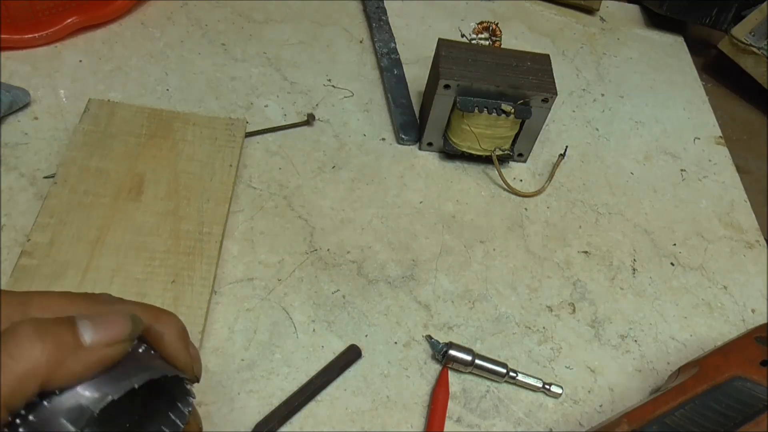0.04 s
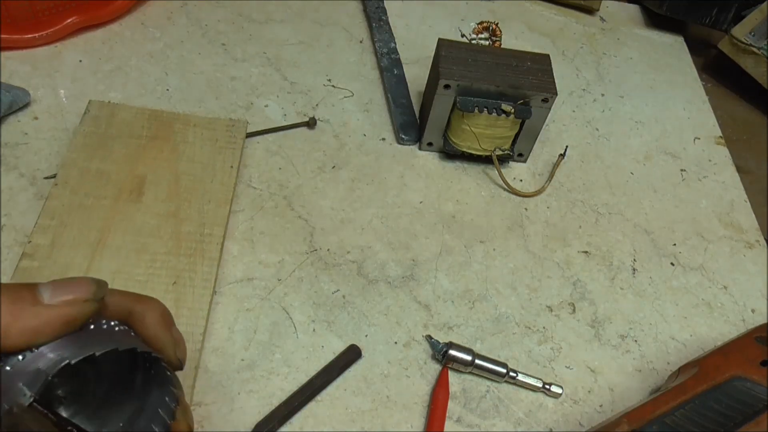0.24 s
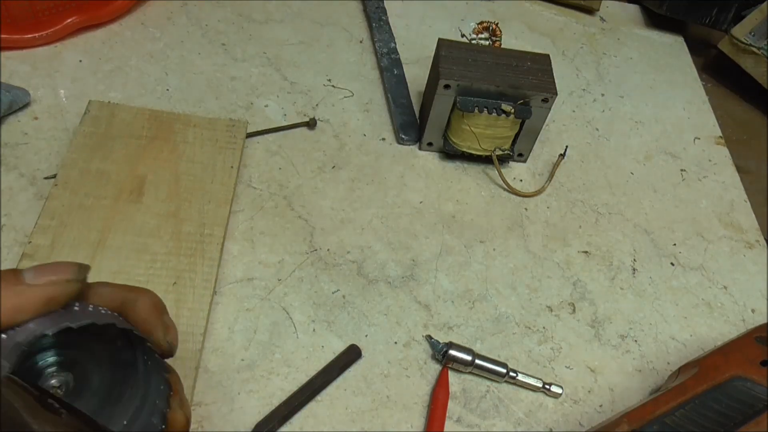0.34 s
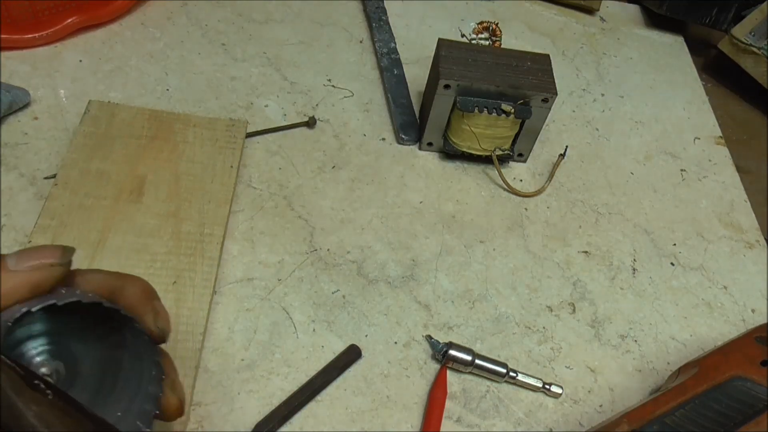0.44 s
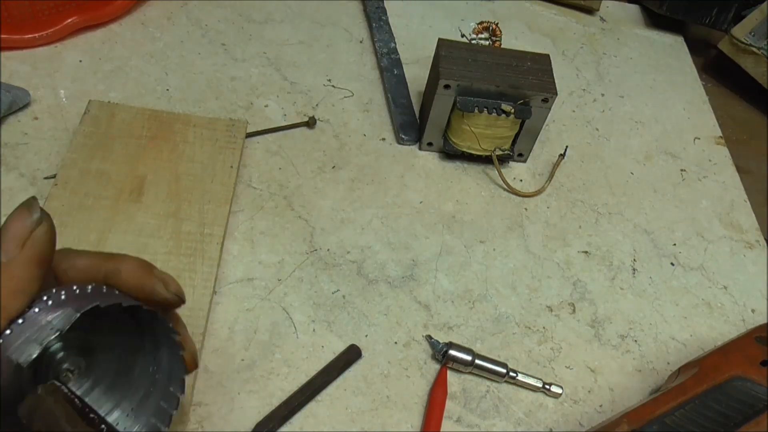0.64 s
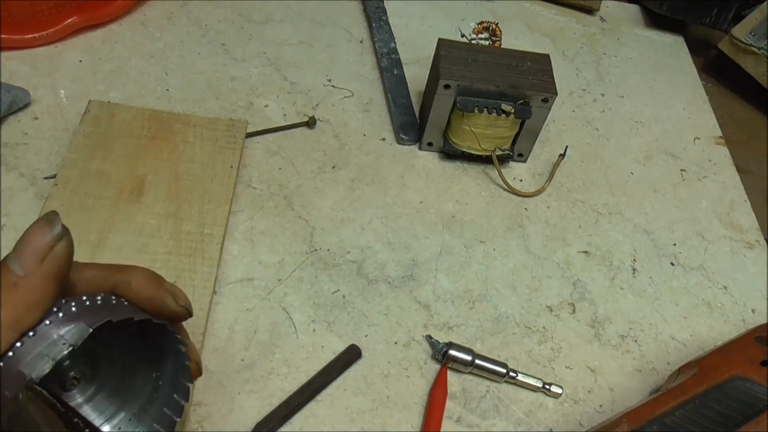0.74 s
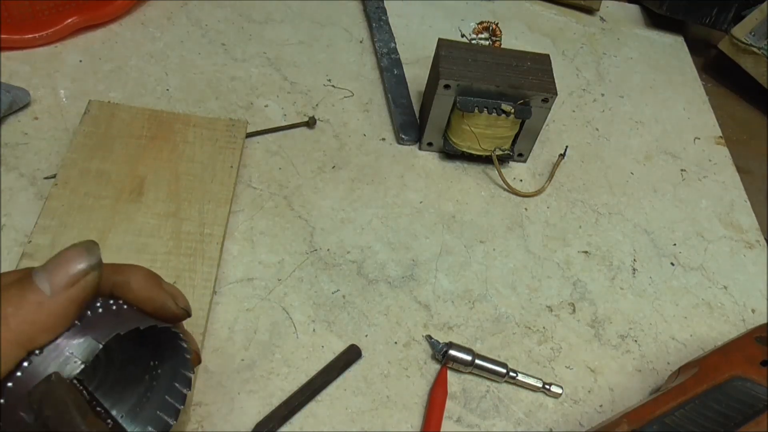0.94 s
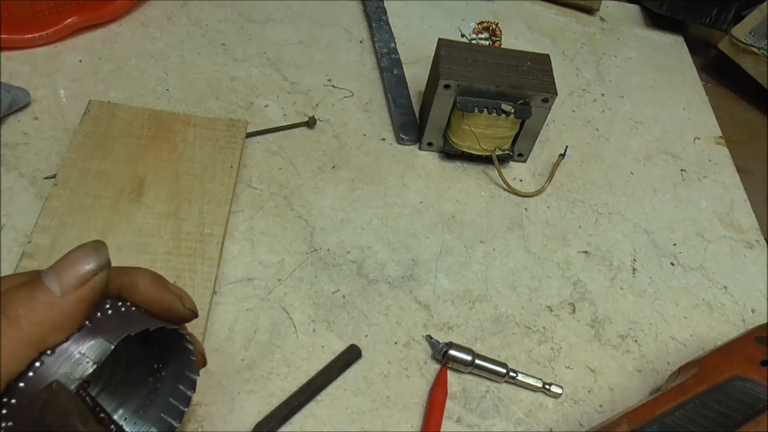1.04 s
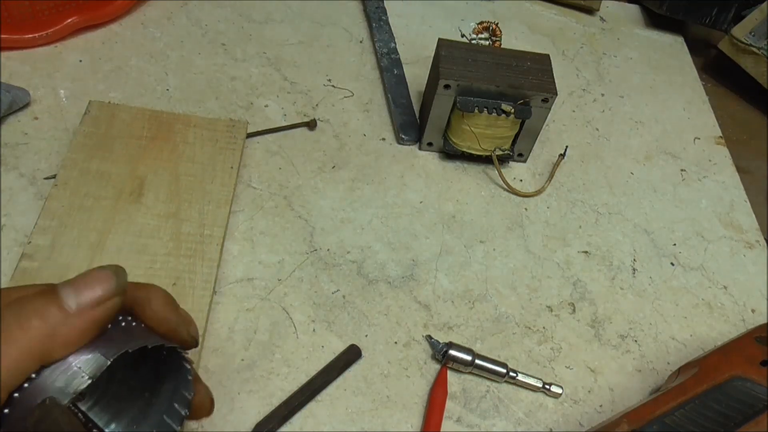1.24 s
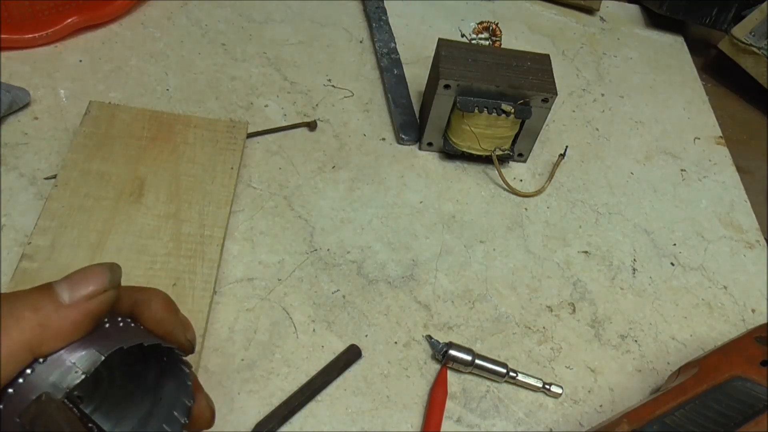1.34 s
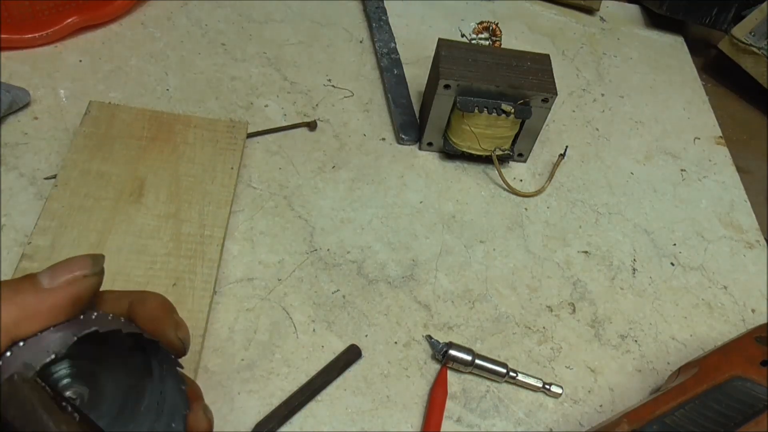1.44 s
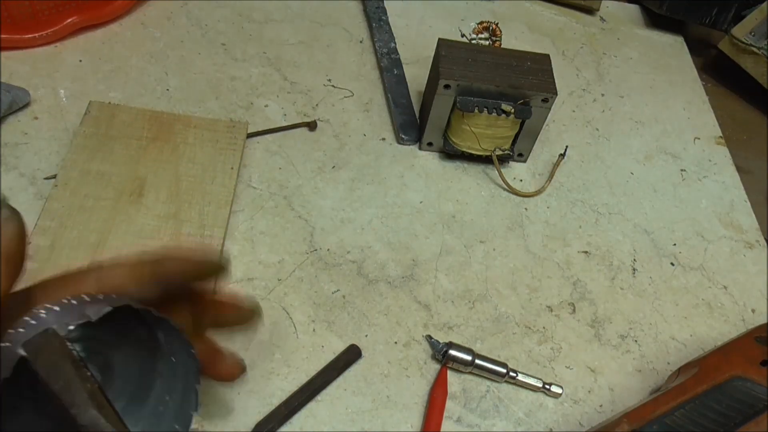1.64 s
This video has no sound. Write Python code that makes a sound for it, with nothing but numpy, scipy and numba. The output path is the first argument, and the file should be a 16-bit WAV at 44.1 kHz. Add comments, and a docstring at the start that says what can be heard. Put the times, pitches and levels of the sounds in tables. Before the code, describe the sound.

Close stereo pickup of thin sheet metal flexed in the hand, one bright hard snap followed by smaller ticks and brief scratches, with a short room tail and a constant airy fan hum slightly right.

```python
"""A fan's rush and hum fill a workshop, slightly right, from shaped noise and steady tones.
A thin treble hiss throbs over it: noise moved to a drifting pitch and pulsed.
Close to a stereo camera, a little left, a thin perforated metal dish is turned and bent by hand:
small ticks, short scrapes and one loud snap ring the modes of the sheet, with a few dull bumps
and a short room tail. The camera's limiter ducks after the snap."""
import sys
import numpy as np
from scipy import signal
from scipy.fft import rfft, irfft
from scipy.io import wavfile
from scipy.ndimage import uniform_filter1d
from numba import njit

SR = 44100
rng = np.random.default_rng(int(sys.argv[2]) if len(sys.argv) > 2 else 0)


def to_wav(sig):
    """Store sig (one row per channel, or 1-D mono) as 16-bit WAV at the path in sys.argv[1].

    Samples outside -1..1 are clipped; the rate is SR.
    """
    pcm = np.clip(np.atleast_2d(sig), -1, 1) * 32767
    pcm = np.round(pcm).astype(np.int16)
    wavfile.write(sys.argv[1], SR, pcm.T)  # frames by channels


def invert_db(level):
    """Linear amplitude ratio for a level in decibels (20 dB per decade), elementwise."""
    return 10 ** (np.asarray(level, dtype=float) / 20)


N = 74970
T = np.arange(N) / SR
LEFT_RIGHT = np.array([[1], [-1]])


def unit(x):
    """Scale to rms 1."""
    return x / np.sqrt(np.mean(x ** 2))


def coloured(db_of_hz):
    """Noise whose spectrum follows a curve of level over frequency."""
    hz = np.arange(N // 2 + 1) * SR / N + 1
    return irfft(rfft(rng.standard_normal(N)) * invert_db(db_of_hz(hz)), N)


def read(table, hz):
    """Read a spectrum table on a log-frequency axis."""
    table_hz, db = np.array(table).T
    return np.interp(np.log(hz), np.log(table_hz), db)


# rush of air, shape only: (frequency [Hz], relative level per Hz [dB])
AIR_SPECTRUM = [(25, -43), (130, -20), (310, -14), (550, -10.5), (770, -7.5), (1090, -11), (1400, -8.5),
                (1830, -10), (2000, -17.5), (2900, -25.5), (3600, -34.5), (4500, -27), (5300, -35.5),
                (6300, -33.5), (7400, -27), (8200, -38), (9000, -26.5), (10200, -39), (13000, -39.5),
                (15700, -36), (16500, -74)]
# stereo spread of the rush: (frequency [Hz], side minus mid [dB])
AIR_SPREAD = [(60, 3), (110, -7.5), (200, -1), (380, -6.5), (700, -5.5), (1290, -12), (2380, 1),
              (4400, -4.5), (15000, -3)]
# fan tones: (frequency [Hz], level before panning [dB], skirt width [Hz], side against tone level [dB])
FAN_TONES = [(401.3, -66.5, 15, -6), (802.6, -69, 15, -8), (1203.9, -59, 22, -8), (1663, -72, 15, -8),
             (5760, -80, 62, -4)]


def fan():
    """Broad air noise plus motor tones, each with a rough skirt of noise, a little to the right."""
    air_db, pan_db = -56.5, -2
    mid = coloured(lambda f: read(AIR_SPECTRUM, f))
    side = coloured(lambda f: read(AIR_SPECTRUM, f) + read(AIR_SPREAD, f))
    out = invert_db(air_db) * (mid + LEFT_RIGHT * side) / np.std(mid)
    for hz, db, width_hz, side_db in FAN_TONES:
        def skirt():
            """Narrow noise around the tone, rms 1."""
            return unit(coloured(lambda f: -20 * np.log10(1 + ((f - hz) / width_hz * 2) ** 2)))

        pure = np.sin(2 * np.pi * hz * T) * (width_hz < 60)  # the widest is noise alone
        out = out + invert_db(db) * (pure + 0.6 * skirt() + LEFT_RIGHT * invert_db(side_db) * skirt())
    return out * invert_db(LEFT_RIGHT * pan_db / 2)


# course of the hiss: (time [s], level before pulsing [dB], centre frequency [Hz])
THROB_COURSE = [(0, -83, 9100), (0.278, -86.5, 9400), (0.358, -68, 9300), (.65, -68, 9280),
                (.75, -87, 9150), (1.25, -75, 8500), (1.7, -80, 8630)]


def throb():
    """A thin band of noise, shifted up to a drifting pitch, that pulses a few times a second."""
    width_hz, pulses_per_s, peak_s = 1200, 7.5, .505
    s, db, hz = np.array(THROB_COURSE).T
    # the noise is centred on width_hz, so it is shifted by the rest
    turn = np.exp(2j * np.pi * np.cumsum(np.interp(T, s, hz) - width_hz) / SR)

    def band():
        """One shifted band of noise, rms 1."""
        low_noise = coloured(lambda f: -48 * (f / width_hz - 1) ** 2)
        return unit((signal.hilbert(low_noise) * turn).real)

    pulse = (.5 + .5 * np.cos(2 * np.pi * pulses_per_s * (T - peak_s))) ** 0.53
    return invert_db(np.interp(T, s, db)) * pulse * (band() + .6 * band() * LEFT_RIGHT)


def ring(x, hz, t60):
    """One decaying mode: a complex resonator that falls 60 dB in t60 seconds."""
    pole = np.exp(2j * np.pi * hz / SR - np.log(1000) / (t60 * SR))
    return signal.lfilter([1], [1, -pole], x).imag


# modes of the sheet: (frequency [Hz], relative drive [dB], decay time t60 [s])
SHEET_MODES = [(1760, -4, 0.014), (2279, -3, 0.026), (2576, 5, 0.012), (3056, 3, 0.0053),
               (3873, -3.5, 0.03), (4006, -7.5, 0.027), (4300, -0.5, 0.0048), (4560, -2.5, 0.0053),
               (4875, -7.5, 0.0089), (4906, -5.5, 0.029), (5760, -30, 0.014), (7700, -6, 0.0026),
               (8500, -6.5, 0.00754), (9530, -9, 0.0031), (10440, -13.5, 0.0066), (12070, 3.5, 0.0067),
               (13400, -1.5, 0.0014), (15000, -10.5, .003)]


def sheet(s, mid_db, grip_hz, low_db, high_db, tilt_db, scatter_db):
    """Each blow rings all modes; the grip decides which of the middle ones, and one overtone of them."""
    low_hz, high_hz, pair_hz = 3300, 5300, 4000
    grip_octaves, overtone = 0.067, 3
    swell_s, crackle_s, treble_scatter = .001, .0012, 3

    def off_grip(hz):
        """Loss in dB, before any cap, of a mode away from the grip's pitch."""
        return 3 * (np.log2(hz / grip_hz) / grip_octaves) ** 2

    chance, out = rng.standard_normal((len(s), len(SHEET_MODES))), 0
    at = np.clip((s * SR).astype(int), 0, N - 1)
    for k, (hz, db, t60) in enumerate(SHEET_MODES):
        middle, treble = low_hz < hz < high_hz, hz > high_hz
        if hz < low_hz:
            blow = low_db
        elif treble:
            blow = high_db + tilt_db * np.log2(hz / 8000)
        else:
            blow = mid_db - np.minimum(np.where(hz > grip_hz, 13, 21), off_grip(hz))
        if 11400 < hz < 12400:  # the overtone follows the grip too
            blow = blow - np.minimum(15, off_grip(hz / overtone))
        spread_db = scatter_db * (treble_scatter if treble else 1)
        drive = np.bincount(at, invert_db(blow + db + spread_db * chance[:, k]), N)
        if middle:  # these swell up before they decay
            drive = ring(drive, hz, swell_s) * 2 * np.log(1000) / (swell_s * SR)
        if treble:  # the treble crackles on for a moment
            crackle = 0.29 * rng.standard_normal(300) * np.exp(-T[:300] / crackle_s)
            drive = np.convolve(drive, crackle)[:N]
        # middle neighbours start a quarter turn apart, save the close pair that beats;
        # the others swing opposite
        phase = (-1j if middle else -1) ** (k + (hz < pair_hz))
        out = out + ring(drive * phase, hz, t60)
    return out


# scrapes: (start [s], length [s], middle drive [dB], grip frequency [Hz],
#           low drive [dB], high drive [dB], treble tilt [dB per octave])
SCRAPE_TABLE = [(0.106, .04, -69.5, 4120, -79, -71, -44), (0.376, .09, -77, 4300, -91, -77.5, -22.5),
                (0.468, 0.087, -82, 4150, -99, -80.5, -22), (0.847, 0.03, -62.5, 4750, -69, -77.5, 1),
                (0.943, .068, -63.5, 4510, -76, -78, 3), (1.327, .012, -70, 4370, -78, -65, -1.5),
                (1.679, 0.037, -66.5, 4560, -82, -73.5, -10)]


def scrapes():
    """Dense grains of uneven strength that swell and fade, each a small blow to the sheet."""
    grains_per_s, grain_db, scatter_db = 3000, 2.5, 3
    rows = []
    for start, length, mid, hz, low, high, tilt in SCRAPE_TABLE:
        place, strength = rng.random((2, int(length * grains_per_s)))
        swell = 10 * np.log10(np.sin(np.pi * place) + .01)
        db = swell - grain_db * np.log(strength + 0.016)
        same = np.zeros(len(db))
        rows.append([start + length * place, mid + db, hz + same, low + db, high + db, tilt + same])
    return sheet(*np.hstack(rows), scatter_db)


# ticks and the snap: (time [s], middle drive [dB], grip frequency [Hz],
#                      low drive [dB], high drive [dB], push of air before its low-pass [dB])
TICK_TABLE = [(0.1157, -51.5, 4140, -58, -65, -42), (0.155, -49, 4250, -69, -64, -66),
              (0.2486, -9, 3900, -25, -20.5, -8.5), (0.385, -61, 4300, -65, -58.5, -71),
              (0.458, -68, 4300, -63, -62, -75), (0.5436, -80, 4800, -68, -52, -75),
              (.559, -69, 4800, -79, -50.5, -75), (0.5817, -51.5, 4520, -61, -69, -75),
              (.591, -52.5, 4800, -78, -55, -75), (0.6806, -26.5, 4850, -47, -45.5, -32.5),
              (0.8124, -46.5, 4900, -68, -48, -71), (0.8235, -38, 4650, -50.5, -70, -48),
              (0.856, -44.5, 4650, -60, -71, -65), (0.8634, -35.5, 4520, -66, -75, -34),
              (0.8676, -49, 4700, -62, -75, -28), (0.8699, -41.5, 4700, -59, -68, -35),
              (0.873, -45, 4570, -47, -77, -63), (0.9735, -37.5, 4500, -68, -64, -31.5),
              (1.0194, -33.5, 4570, -41, -41.5, -37), (1.153, -53, 4700, -58, -75, -56),
              (1.1674, -44.5, 4500, -50, -47.5, -41), (1.2241, -50.5, 4300, -61, -57, -40),
              (1.2606, -52, 4300, -65, -67, -80), (1.3125, -57, 4300, -63, -66, -72),
              (1.3309, -39, 4460, -58.5, -47, -60), (1.651, -81, 4500, -77, -58, -85)]


def ticks():
    """Snap and ticks: ringing plus the short push of air as the sheet jumps."""
    push_s, push_top_hz, scatter_db = .00005, 5000, 1.2
    s, mid, hz, low, high, push = np.array(TICK_TABLE).T
    u = np.arange(200) / SR / push_s
    pulse = -(u / 2) ** 2 * np.exp(2 - u)
    shove = np.convolve(np.bincount((s * SR).astype(int), invert_db(push), N), pulse)[:N]
    soften = signal.butter(4, push_top_hz, fs=SR, output="sos")
    return sheet(s, mid, hz, low, high, 0, scatter_db) + signal.sosfilt(soften, shove)


# dull bumps of the hand: (time of peak [s], level [dB], frequency [Hz], length between 1/e points [s])
BUMP_TABLE = [(0.463, -57.5, 222, 0.017), (0.478, -53, 140, 0.01), (1.336, -58.5, 148, 0.0152)]


def bumps():
    """Soft low thuds: sines under a bell-shaped swell."""
    out = np.zeros(N)
    for s, db, hz, length in BUMP_TABLE:
        swell = np.exp(-((T - s) / (length / 2)) ** 2)
        out += invert_db(db) * swell * np.sin(2 * np.pi * hz * T)
    return out


def room(metal):
    """Short stereo room tail: decaying noise with a softened treble, convolved with the sheet."""
    level_db, t60_s, top_hz = -17.5, .14, 4500
    t = T[:SR // 4]
    tail = rng.standard_normal((2, len(t))) * invert_db(-60 * t / t60_s)
    tail = signal.sosfilt(signal.butter(1, top_hz, fs=SR, output="sos"), tail)
    tail = tail / np.sqrt(np.sum(tail ** 2) / 2)
    return invert_db(level_db) * signal.fftconvolve(metal[None], tail, axes=1)[:, :N]


def scene():
    """The sheet, near and a little left, with a short room tail, over the workshop."""
    thin_hz, pan_db, lag_s = 470, 1.6, .000011
    background = fan() + throb()
    thin = signal.butter(2, thin_hz, "high", fs=SR, output="sos")
    metal = signal.sosfilt(thin, scrapes() + ticks()) + bumps()
    # the right port hears the sheet later
    hz = np.arange(N // 2 + 1) * SR / N
    late = irfft(rfft(metal) * np.exp(-2j * np.pi * hz * lag_s), N)
    near = np.array([metal, late]) * invert_db(LEFT_RIGHT * pan_db / 2)
    return near + room(metal) + background


@njit
def follow(x, release):
    """Peak follower: instant rise, slow fall."""
    e, y = 0., np.empty(len(x))
    for i in range(len(x)):
        e = max(x[i], e * release)
        y[i] = e
    return y


def roll_off(x):
    """The treble ends steeply here."""
    return signal.sosfilt(signal.butter(12, 16830, fs=SR, output="sos"), x)


def record(dry):
    """The camera's limiter ducks after loud peaks and recovers; the top is cut."""
    limit_db, ratio, release_s, top_hz = -29, 1.49, 0.062, 15900
    peak = follow(np.abs(dry).max(axis=0), np.exp(-1 / (release_s * SR)))
    gain = np.minimum(1, invert_db(limit_db) / (peak + 1e-9)) ** (1 - 1 / ratio)
    gain = uniform_filter1d(gain, size=200, origin=99)  # mean of the latest 200 samples: it ducks late
    top_cut = signal.ellip(6, .2, 40, top_hz, fs=SR, output="sos")
    mix = signal.sosfilt(top_cut, dry * gain)
    return roll_off(mix)


dry = scene()
out = record(dry)
to_wav(out)
```